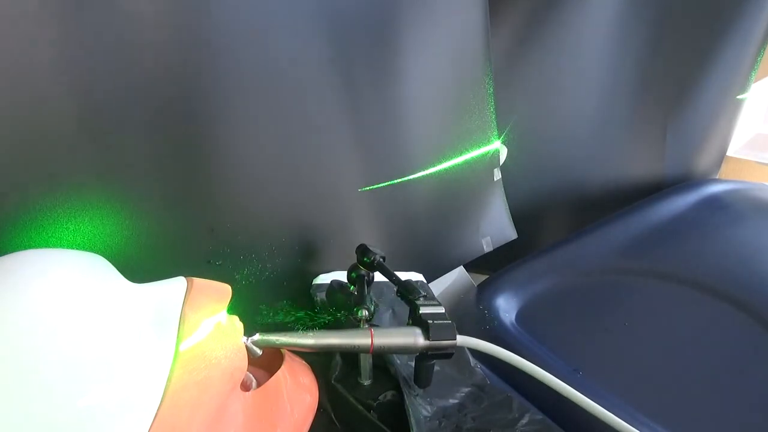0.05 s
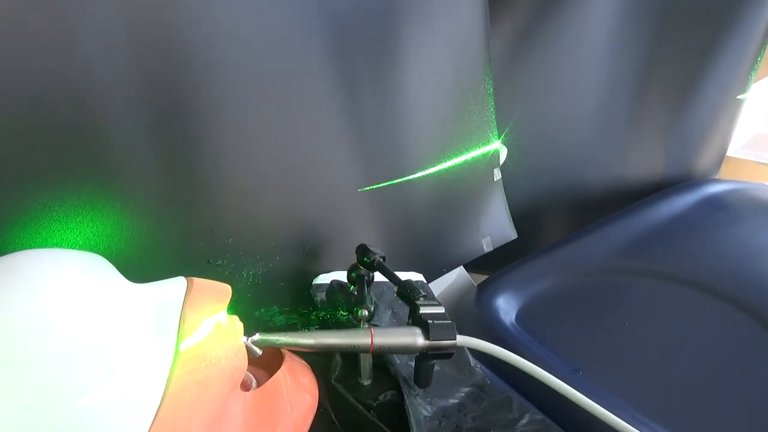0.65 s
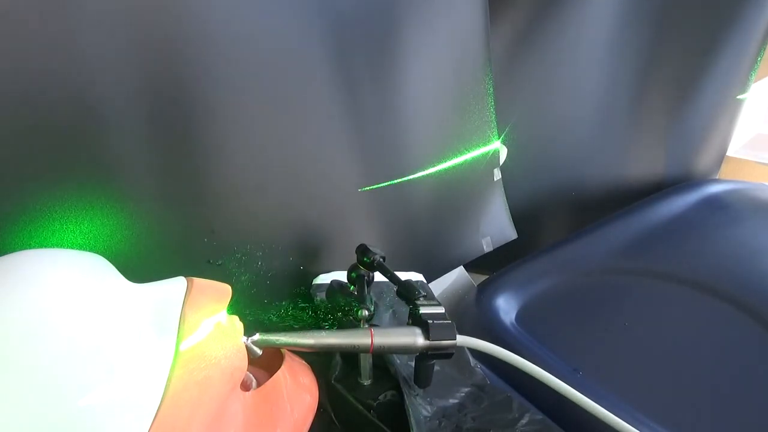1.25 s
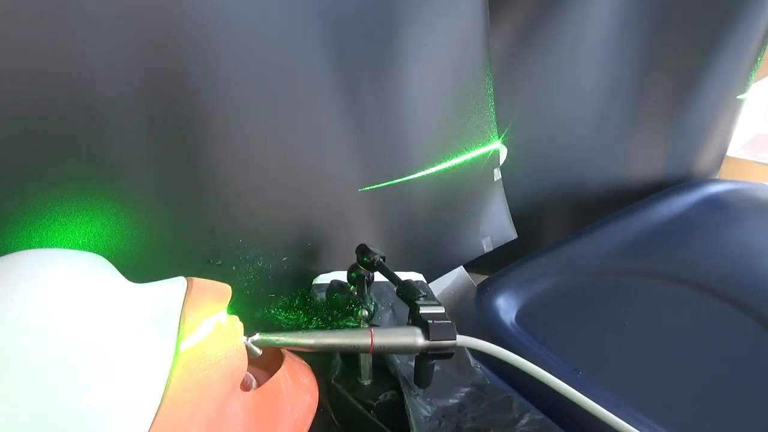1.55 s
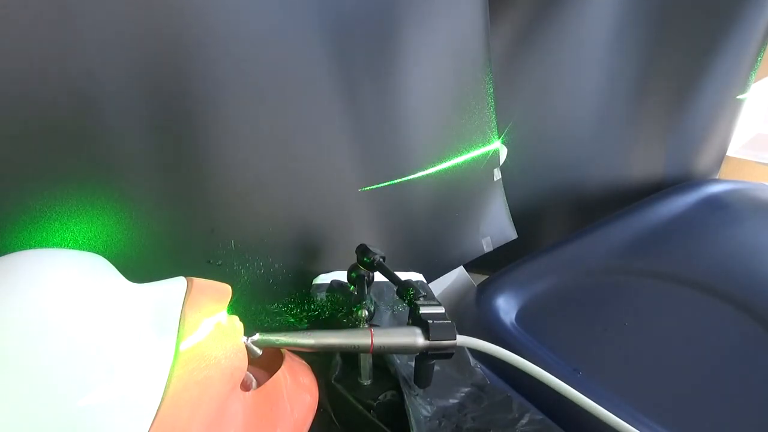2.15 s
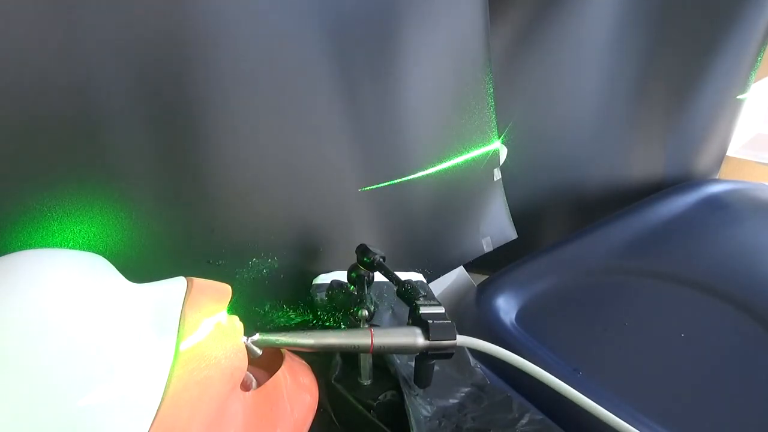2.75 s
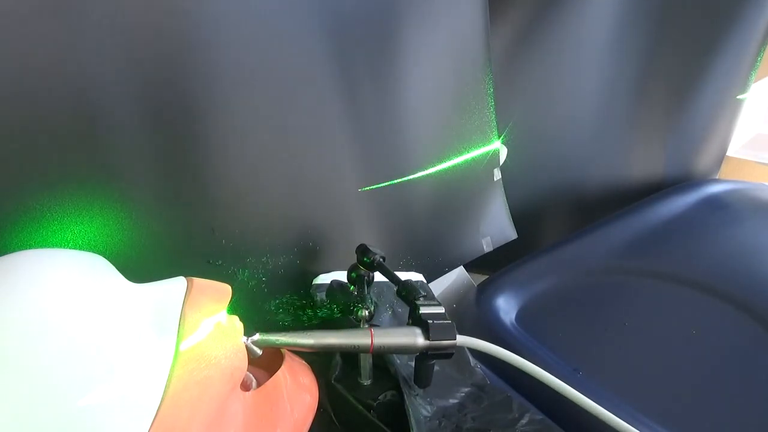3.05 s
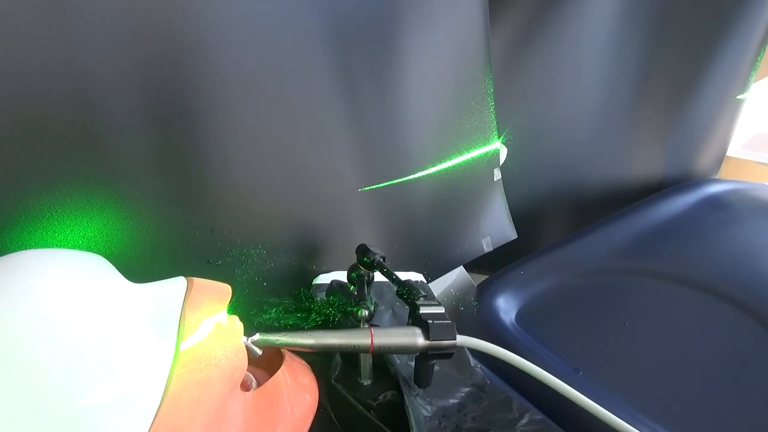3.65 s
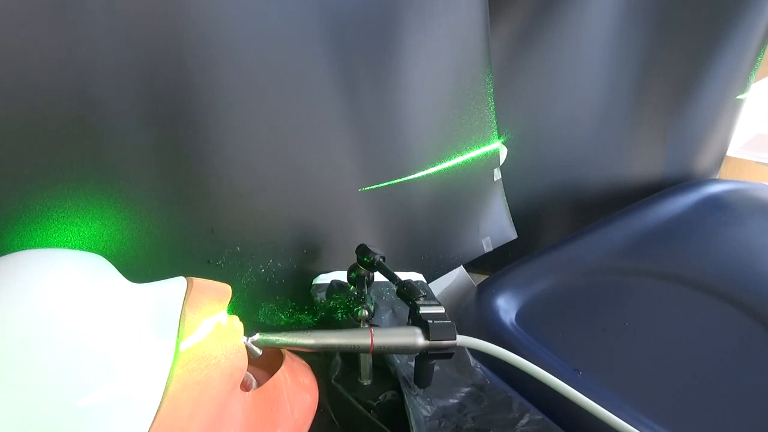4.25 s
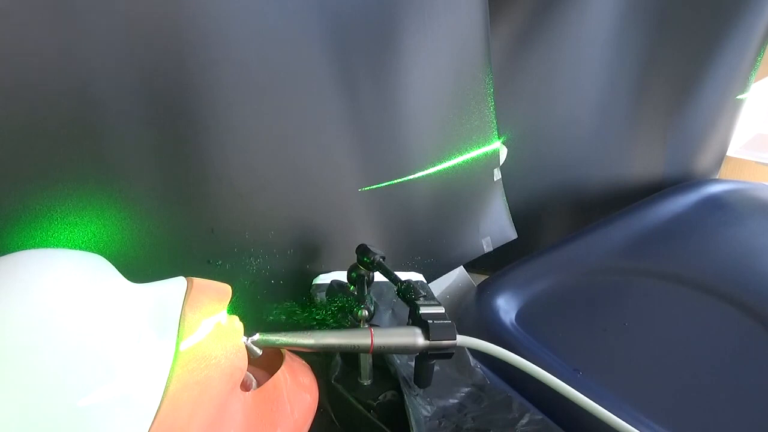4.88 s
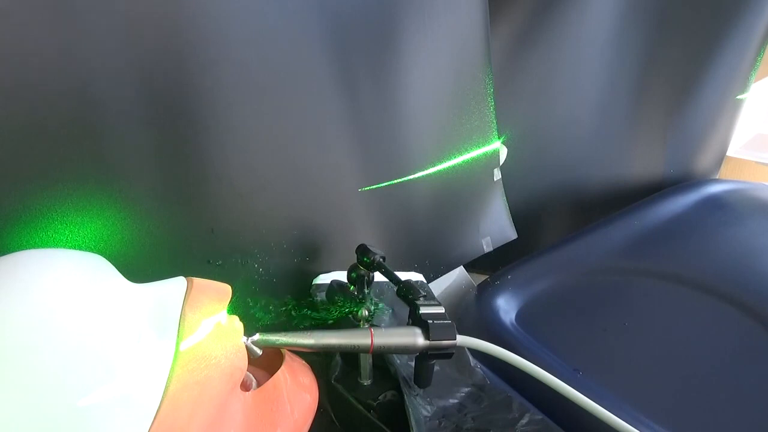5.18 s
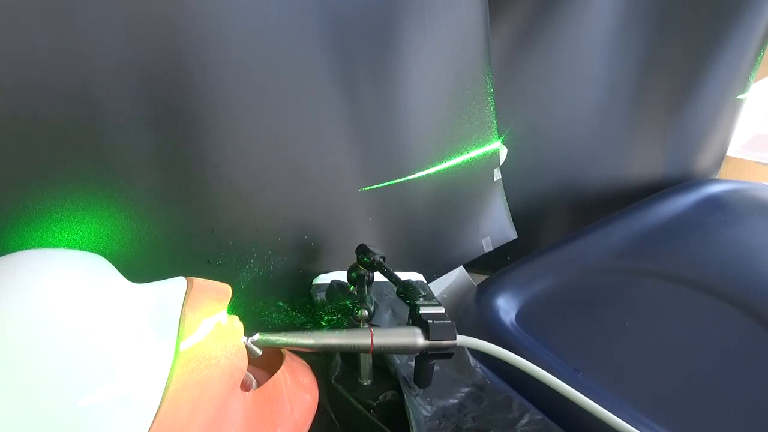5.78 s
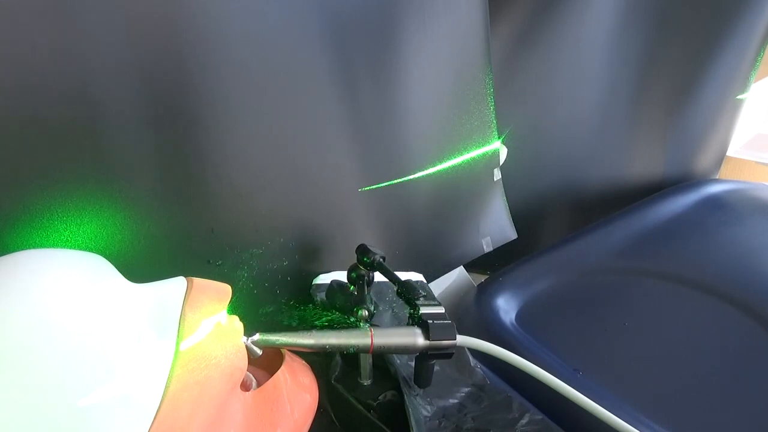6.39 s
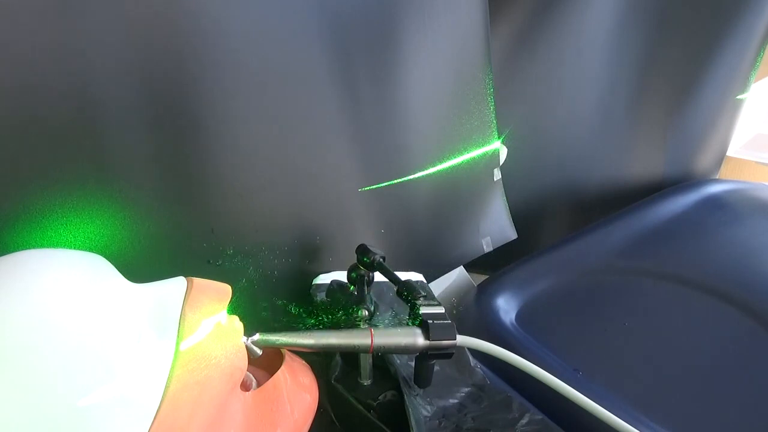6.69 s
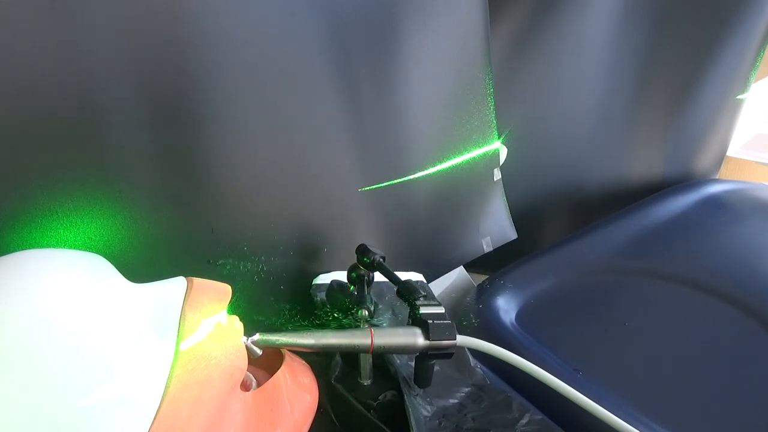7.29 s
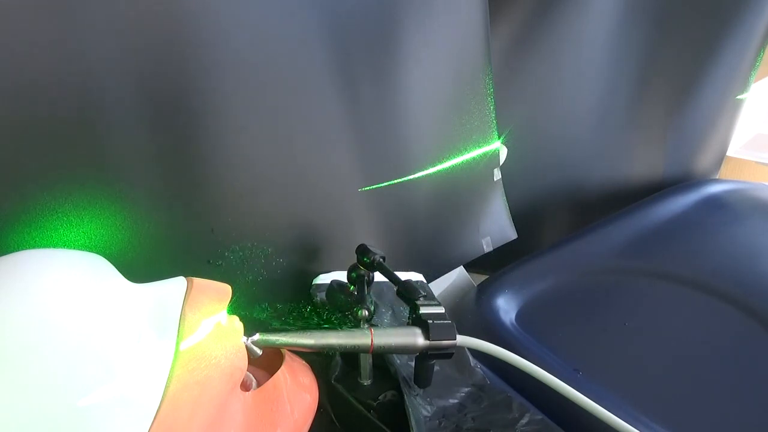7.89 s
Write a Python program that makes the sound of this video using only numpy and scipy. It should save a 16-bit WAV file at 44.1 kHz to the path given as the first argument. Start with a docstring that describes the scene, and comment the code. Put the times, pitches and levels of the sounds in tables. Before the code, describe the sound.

A dental handpiece runs freely, close to the microphone, blowing air and water mist in a loud, bright hiss with a fine splutter. Its gears add a high, slightly wavering whine, and thin whistles above it swell faintly a few times. Underneath, a suction unit holds one steady note over a hollow roar and a low hum. Everything continues without a break.

```python
"""From the start, a close, free-running dental handpiece blows air and water mist: the jet hisses,
splutters and pulses once a shaft turn; the gears whine, their speed hunting about 7 times a second.
Underneath, suction sings one steady note over a hollow roar and a low hum.
The top bearing whistles flare four times from 1.1 to 3.7 s. One low hum line is raised
from about 3.5 to 6 s. The whistles flare once more at 7.3 s."""
import sys
import numpy as np
from scipy import signal
from scipy.fft import rfft, irfft, next_fast_len
from scipy.io import wavfile

SR = 44100
rng = np.random.default_rng(int(sys.argv[2]) if len(sys.argv) > 2 else 0)


def output_pcm(signal):
    """Save a mono or channel-first signal as 16-bit PCM at the path in sys.argv[1].

    Samples are clipped to [-1, 1] before scaling.
    """
    pcm = np.clip(np.atleast_2d(signal).T, -1, 1) * 32767
    wavfile.write(sys.argv[1], SR, np.round(pcm).astype(np.int16))


N = 358533
SHAFT_HZ, BAND_LIMIT_HZ = 153.25, 15740

# jet spectrum: f/Hz, relative level/dB
JET_SLOPE_DB = [(2500, -38.0), (3200, -19.5), (4200, -12.5), (5300, -8.5), (6400, -1.66), (7700, -11.5),
                (9000, -11.5), (10400, -3), (12600, -2), (14000, -1.5), (15700, -4)]
# nozzle and head resonances: f/Hz, width/Hz, lift/dB
NOZZLE_MODES = [(4760, 240, 3.5), (6786, 370, 6.4), (7180, 674, 12.5), (8334, 1386, 16.5), (9190, 320, 6),
                (9548, 616, 15), (10020, 400, 8.5), (10810, 750, 5.5), (12180, 590, 6), (12997, 123, 3.0)]
# water break-up's part of the jet power: f/Hz, share/1
WATER_POWER_SHARE = [(3000, 0.35), (4800, 0.45), (7000, 0.16), (8300, 0.44), (9200, 0.97), (10000, 0.87),
                     (10700, 0.48), (14000, 0.34)]
# gear mesh tones: shaft order/1, relative level/dB, share of swell and throb/1
MESH_ORDERS = [(17, -5.5, .3), (18, 0, 1)]
# gear whine drift, before swell and throb: t/s, level/dB
MESH_LEVEL_DB = [(0.0, -53), (0.2, -55.5), (2.1, -54), (2.3, -56.5), (2.8, -52.8), (3.3, -57.4), (3.5, -55),
                 (4.3, -56), (6.3, -54.9), (6.8, -58), (7.0, -55), (8.13, -56.5)]
# bearing tones at mean speed, before trim and flares: f/Hz, level/dB
BEARING_LINES = [(5525, -67), (5774, -69), (6339, -62), (6504, -57.5), (7429, -56.6), (7822, -59),
                 (10801, -58.3), (11731, -56.8), (13398, -52), (13660, -52.3), (13800, -58), (14335, -55),
                 (14977, -55)]
# flares of the top whistles: t/s, lift/dB
WHISTLE_FLARES = [(1.14, 2.8), (1.85, 1.8), (2.66, 3.3), (3.65, 3.6), (7.29, 1.5)]
# impeller note, overtones and side tones: f/Hz, level/dB
IMPELLER_LINES = [(769.7, -50), (1329, -72), (1540, -76.5), (1605, -84), (1675, -77), (1927, -78),
                  (2010, -71.5), (2309, -68), (3352, -79)]
# suction roar spectrum: f/Hz, relative level/dB
ROAR_SLOPE_DB = [(20, -20.5), (40, -16), (75, -6), (160, -6.5), (240, -0.5), (580, 0), (1000, -1.5),
                 (1200, -13), (2300, -8.5), (3200, -12), (4200, -41)]
# hose and cabinet resonances: f/Hz, width/Hz, lift/dB
DUCT_MODES = [(325.9, 38.3, 12.2), (351.8, 18, 7), (376, 15, 0.5), (488.7, 18.5, 10), (679, 41, 6.5),
              (733.3, 25.6, 11.5), (796, 87, 7), (1358, 450, 6), (2020, 61, 6)]
# standing waves, suction unit to microphone: f/Hz, width/Hz, lift/dB
ROOM_MODES = [(102, 18, -4), (213, 14, 3.5), (279, 12, -6), (372, 10, -8), (426, 13, -5), (584, 20, -5.5),
              (650, 7.4, -4), (914, 16, -6)]
# mains and motor hum: f/Hz, level/dB
HUM_LINES = [(49.2, -80.5), (248.2, -73), (320.8, -62.8), (924.5, -76.5)]
# strong low hum line: t/s, level/dB
DRONE_LEVEL_DB = [(0, -74), (3.3, -73.5), (3.6, -70), (5.8, -71), (6.5, -73.5)]
# microphone port balance: f/Hz, left minus right level/dB
PORT_BALANCE_DB = [(100, 0.5), (320, -3), (520, -3), (770, 1.6), (920, -2), (1100, -0.2), (2480, -0.5),
                   (2600, -4), (2780, -2.5), (2900, 0)]
# left-right difference signal: f/Hz, peak level/dB re the mono mix
STEREO_WIDTH_DB = [(50, -16), (300, -20), (770, -22), (1300, -25), (1900, -47), (2700, -25), (3400, -43),
                   (4500, -48), (7300, -34), (8700, -14.5), (10000, -35), (13500, -42)]


def jet(clock_s, level_db=-36.95, air_pulse=0.064, water_pulse=0.16, splutter_db=4.6, surge_db=0.7):
    """Smooth air and millisecond water bursts share one nozzle; the spinning tip chops both."""
    turn = np.cos(2 * np.pi * SHAFT_HZ * clock_s)
    air = rng.standard_normal(N) * (1 + air_pulse * turn)
    feed = 2.05 * np.tanh(wander(rate_hz=390) / 2.05)  # the thin water feed bounds burst size
    bursts = gain_of(splutter_db * feed + surge_db * wander(rate_hz=21))
    water = unit_rms(rng.standard_normal(N) * bursts * (1 + water_pulse * turn))
    share = np.clip(over_freq(WATER_POWER_SHARE), 0, 1)
    flow = filtered(air, np.sqrt(1 - share)) + filtered(water, np.sqrt(share)) + droplets()
    return gain_of(level_db) * unit_rms(filtered(flow, response(JET_SLOPE_DB, NOZZLE_MODES)))


def droplets(rate_hz=350, spread_db=3, re_flow_db=-13):
    """Single drops tick as they tear from the tip."""
    size = gain_of(spread_db * np.minimum(rng.exponential(1, N), 2))
    polarity = rng.choice([-1, 1], N)
    onsets = rng.random(N) < rate_hz / SR
    return gain_of(re_flow_db) * unit_rms(size * polarity * onsets)


def shaft_speed(hunt_hz=7.0, depth_rms=0.0018, jitter_rms=0.0006):
    """Speed over mean speed: holds, sags, recovers; sags vary in length and depth."""
    cycles = np.cumsum(hunt_hz * (1 + 0.24 * wander(rate_hz=hunt_hz))) / SR
    sag = np.exp(0.9 * np.cos(2 * np.pi * cycles))
    depth = depth_rms * (1 + 0.25 * wander(rate_hz=3))
    return 1 - depth * unit_rms(sag - sag.mean()) + jitter_rms * wander(rate_hz=16.1)


def gears(clock_s, speed, swell_exponent=62, throb_db=1.1):
    """The mesh whines, throbs a little and swells with shaft speed."""
    surge = gain_of(throb_db * wander(rate_hz=6)) * speed ** swell_exponent
    whine = sum(gain_of(db) * surge ** share * tone(order * SHAFT_HZ, clock_s, 0.15, flutter_hz=22)
                for order, db, share in MESH_ORDERS)
    return gain_of(over_time(MESH_LEVEL_DB)) * whine


def bearings(clock_s, trim_db=-0.5, follow=0.85, flare_s=0.13, flare_hz=13600, flare_width_hz=700):
    """Thin whistles partly follow the shaft; higher ones flutter and rasp more."""
    t_s, whistles = np.arange(N) / SR, np.zeros(N)
    bearing_clock_s = t_s + follow * (clock_s - t_s)
    flare_db = sum(db * np.exp(-((t_s - at_s) / flare_s) ** 2) for at_s, db in WHISTLE_FLARES)
    for hz, db in BEARING_LINES:
        height = (hz / BAND_LIMIT_HZ) ** 2
        flare_share = np.exp(-((hz - flare_hz) / flare_width_hz) ** 2)
        rasp_share = np.clip(0.45 * height, 0, 1)
        line = tone(hz, bearing_clock_s, flutter=0.3 + 0.6 * height, flutter_hz=25)
        rasp = tone(hz, bearing_clock_s, flutter=10, flutter_hz=260)  # narrow-band noise
        whistle = np.sqrt(1 - rasp_share) * line + np.sqrt(rasp_share) * rasp
        whistles += gain_of(db + flare_share * flare_db) * whistle
    return gain_of(trim_db) * whistles


def suction(roar_db=-51.9, drift_rms=0.00066):
    """An impeller's steady note over air rushing through a hose."""
    clock_s = np.cumsum(1 + drift_rms * wander(rate_hz=3)) / SR
    note = sum(gain_of(db) * tone(hz, clock_s, flutter=0.11, flutter_hz=9) for hz, db in IMPELLER_LINES)
    roar = filtered(rng.standard_normal(N), response(ROAR_SLOPE_DB, [*DUCT_MODES, *ROOM_MODES]))
    return note + gain_of(roar_db) * unit_rms(roar)


def hum(drone_hz=121.5):
    """Mains and motor lines, wavering slowly."""
    t_s = np.arange(N) / SR
    lines = [*HUM_LINES, (drone_hz, over_time(DRONE_LEVEL_DB))]
    return sum(gain_of(db) * tone(hz, t_s, flutter=0.18, flutter_hz=3) for hz, db in lines)


def stereo_width(mono, t60_s=0.17):
    """A faint left-right phase difference that widens the sound in some bands."""
    kernel = rng.standard_normal(N) * gain_of(-60 * np.arange(N) / SR / t60_s)
    ripple = np.tanh(2 * unit_rms(rfft(kernel, next_fast_len(N)).real))
    return filtered(mono, 1j * ripple * gain_of(over_freq(STEREO_WIDTH_DB)))


def tone(hz, clock_s, flutter, flutter_hz):
    """A line of rms 1 on a machine's clock, fluttering in level and phase."""
    count = int(2 * flutter_hz * N / SR) + 2
    knots = rng.standard_normal((2, N // 10))[:, :count]
    real, imag = (np.interp(np.arange(N), np.linspace(0, N, count), row) for row in knots)
    phase_rad = 2 * np.pi * hz * clock_s
    return unit_rms((1 + flutter * real) * np.cos(phase_rad) + flutter * imag * np.sin(phase_rad))


def wander(rate_hz):
    """Random motion of rms 1, up to about rate_hz."""
    size = next_fast_len(N // 16)
    hz = np.fft.rfftfreq(size, N / SR / size)
    slow = irfft(rfft(rng.standard_normal(size)) / (1 + (hz / rate_hz) ** 4), size)
    return unit_rms(np.interp(np.arange(N), np.linspace(0, N, size), slow))


def response(slope, modes):
    """Gain per bin: a slope plus one bell per mode."""
    lift_db = sum(db * 2 ** -((2 * (bins_hz() - hz) / width_hz) ** 2) for hz, width_hz, db in modes)
    return gain_of(over_freq(slope) + lift_db)


def filtered(x, gain):
    """Applies a gain per bin."""
    size = next_fast_len(N)
    return irfft(rfft(x, size) * gain, size)[..., :N]


def over_freq(points):
    """Joins (f/Hz, value) points on a log axis."""
    hz, value = np.transpose(points)
    return np.interp(np.log(bins_hz() + 1), np.log(hz + 1), value)


def over_time(points):
    """Joins (t/s, value) points linearly."""
    t_s, value = np.transpose(points)
    return np.interp(np.arange(N) / SR, t_s, value)


def bins_hz():
    """Bins of the full-length spectrum."""
    return np.fft.rfftfreq(next_fast_len(N), 1 / SR)


def gain_of(db):
    """dB to amplitude."""
    return 10 ** (np.asarray(db) / 20)


def unit_rms(x):
    """Scales to rms 1."""
    return x / np.sqrt(np.mean(x ** 2) + 1e-20)


def scene():
    """All sources mixed to mono, then balanced left-right by band and widened."""
    speed = shaft_speed()
    clock_s = np.cumsum(speed) / SR  # time as the shaft counts it
    mono = jet(clock_s) + gears(clock_s, speed) + bearings(clock_s) + suction() + hum()
    sides = np.array([[1], [-1]])
    balance = gain_of(sides * over_freq(PORT_BALANCE_DB) / 2)
    return filtered(mono, balance) + sides * stereo_width(mono)


def record(dry):
    """Steep low-pass at the band limit."""
    taps = signal.firwin(4095, BAND_LIMIT_HZ, window=("kaiser", 9), fs=SR)
    return signal.oaconvolve(dry, taps[None], "same", axes=1)


dry = scene()
out = record(dry)
output_pcm(out)
```